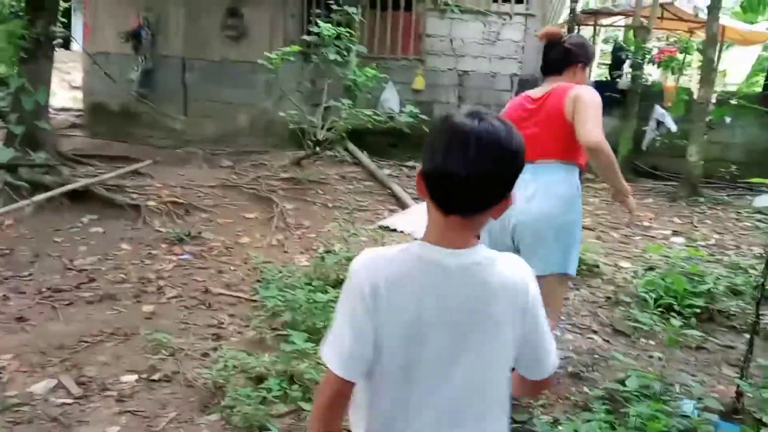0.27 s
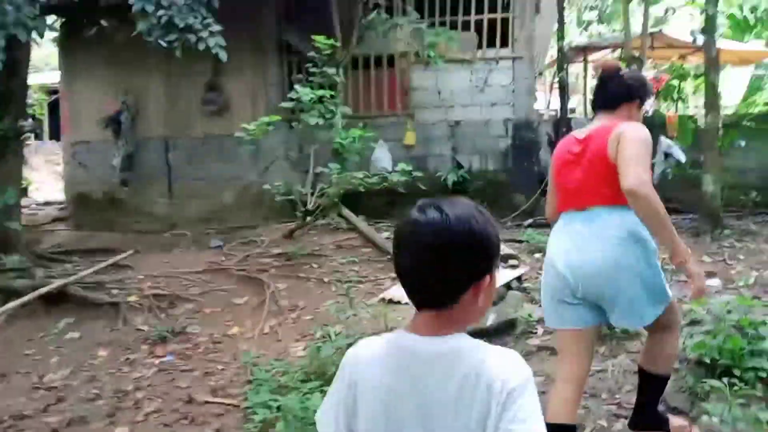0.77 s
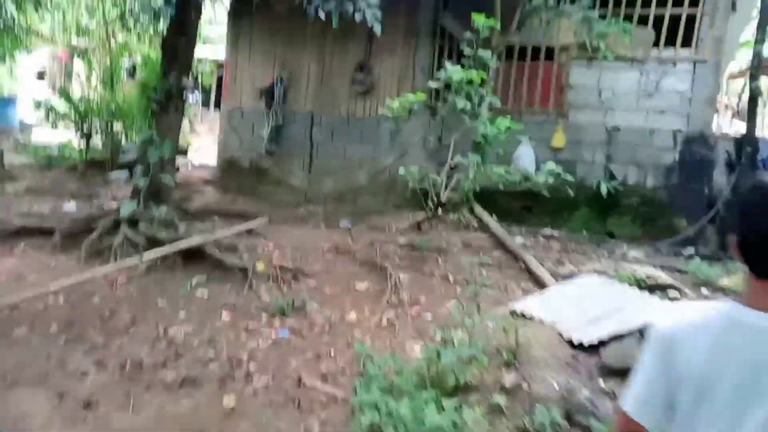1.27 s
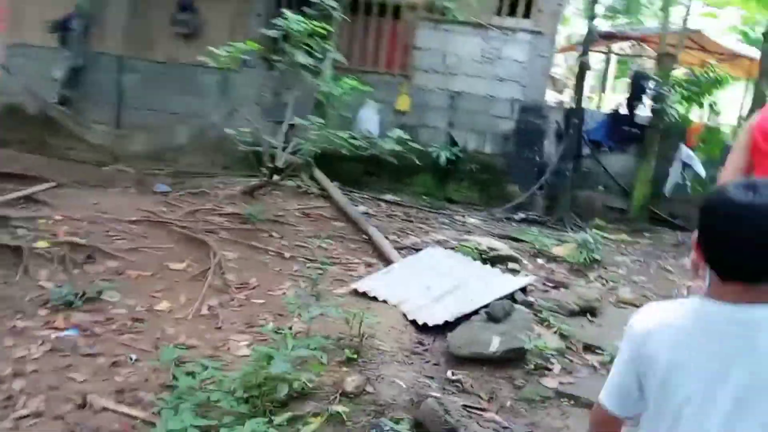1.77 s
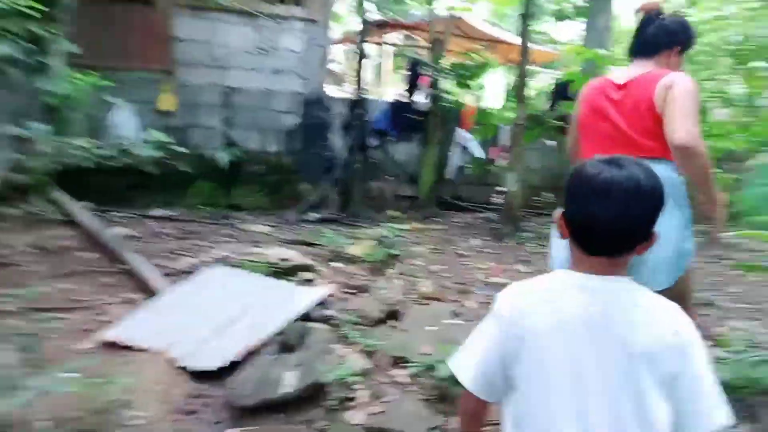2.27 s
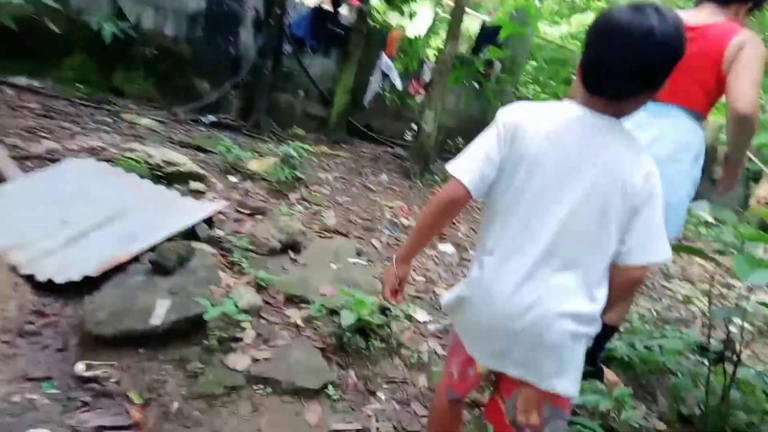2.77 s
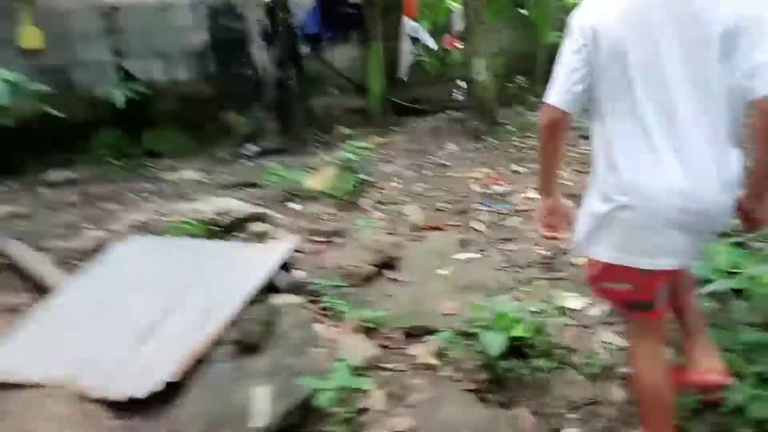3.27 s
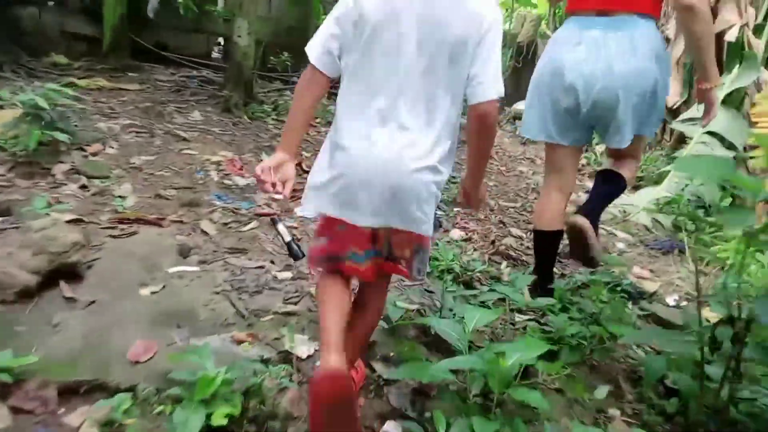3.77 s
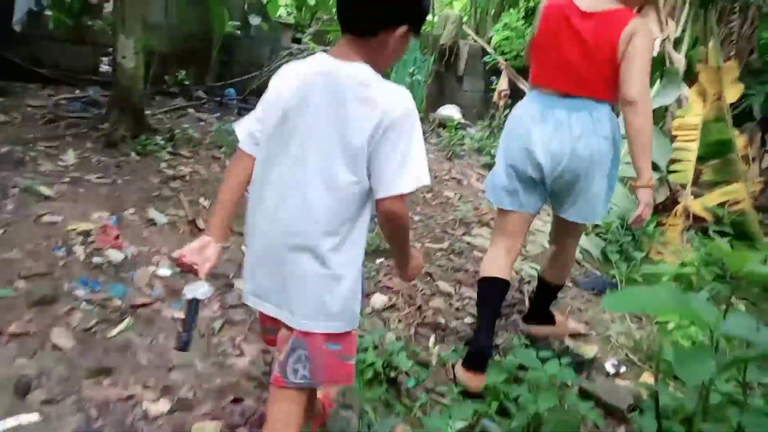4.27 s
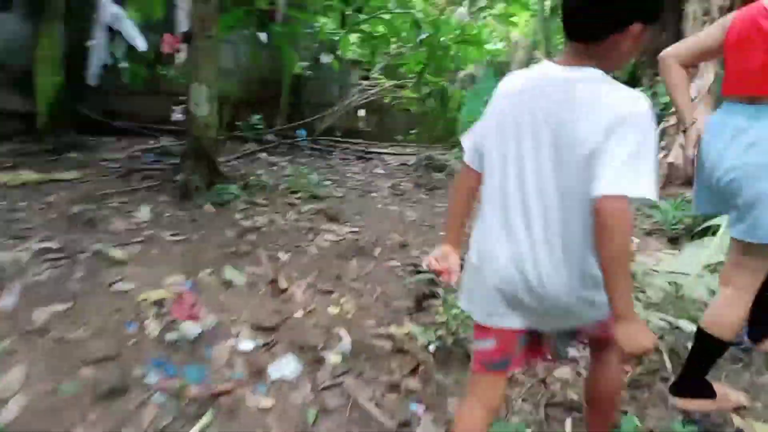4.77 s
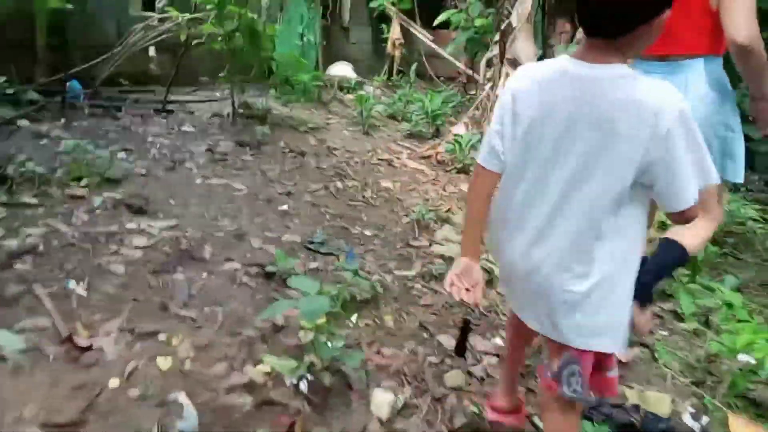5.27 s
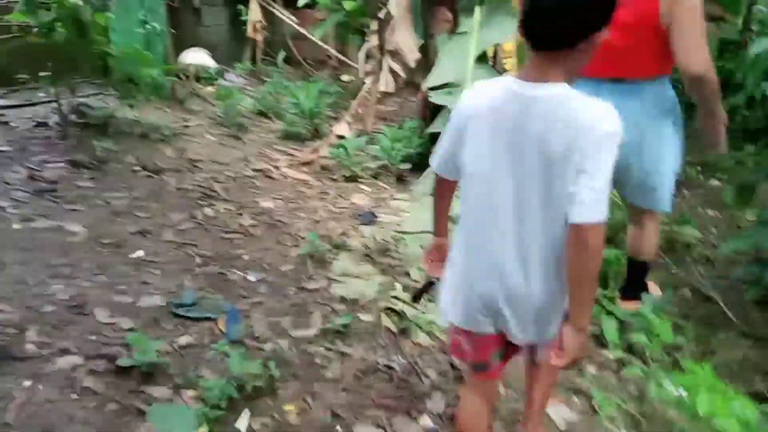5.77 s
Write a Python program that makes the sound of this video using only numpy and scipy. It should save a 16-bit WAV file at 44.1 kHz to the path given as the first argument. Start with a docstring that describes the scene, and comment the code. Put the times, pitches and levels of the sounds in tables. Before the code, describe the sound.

A nearby rooster crows loud and hoarse as feet rustle through dry leaves and snap twigs, then a distant rooster answers more faintly.

```python
"""A rooster close by crows hoarsely in a wooded yard: two beating membranes and a noise-driven windpipe.
From the start feet stir dry leaves, as dense noise grains, over air, rumble, a motor hum and insect hiss.
Twigs snap and heels knock as short rings; then come hoarse chirps and a haze (noise in one band each)
and thin whistled tones that glide, near 2 kHz.
Soles scuff soil, and a distant rooster answers with a cleaner crow whose octave often leads."""
import sys
import numpy as np
from scipy import signal
from scipy.fft import rfft, irfft, next_fast_len
from scipy.io import wavfile
from scipy.ndimage import uniform_filter1d

SR = 44100
rng = np.random.default_rng(int(sys.argv[2]) if len(sys.argv) > 2 else 0)


def materialize(psi):
    """Save the field psi as 16-bit PCM at rate SR to the path in sys.argv[1].

    A 1-D psi becomes a single channel; in a 2-D psi each row is a channel.
    """
    bounded = np.clip(np.atleast_2d(psi).T, -1, 1)
    quanta = np.round(bounded * 32767).astype(np.int16)
    wavfile.write(sys.argv[1], SR, quanta)


def linear_from_db(decibels):
    """Turn decibels (scalar or array-like) into linear amplitude factors; 0 gives 1."""
    return 10 ** (np.asarray(decibels, float) / 20)


N = 264820
T = np.arange(N) / SR


def evened(x):
    """Normalisation: scales to rms 1."""
    return x / np.sqrt(np.mean(x ** 2) + 1e-20)


def add(mix, s, sound):
    """Superposition: adds a sound into the mix from time s."""
    part = mix[round(s * SR):][:len(sound)]
    part += sound[:len(part)]


def along(rows):
    """Linear interpolation of a table: sample times, then each column per sample."""
    s, *columns = np.transpose(rows)
    t = np.arange(s[0], s[-1], 1 / SR)
    return [t] + [np.interp(t, s, c) for c in columns]


def drift(length, seconds):
    """Low-pass random fluctuation: noise averaged twice over a window, at rms 1."""
    size = max(round(seconds * SR), 1)
    noise = rng.standard_normal(length)
    return evened(uniform_filter1d(uniform_filter1d(noise, size), size))


def resonate(x, hz, width):
    """Resonance by heterodyning: shift hz to zero, low-pass with a double pole, shift back; peak gain 1."""
    turn = np.exp(2j * np.pi * np.cumsum(hz * np.ones(len(x))) / SR)
    r = np.exp(-np.pi * width / SR)
    lowered = signal.lfilter([(1 - r) ** 2], [1, -2 * r, r * r], x / turn)
    return 2 * (turn * lowered).real


def colour(x, points):
    """Linear filtering: multiplies the spectrum by a gain curve over log frequency."""
    f, db = np.transpose(points)
    size = next_fast_len(N)
    hz = np.fft.rfftfreq(size, 1 / SR)
    gain = linear_from_db(np.interp(np.log(hz + 1), np.log(f), db))
    return irfft(rfft(x, size) * gain)[..., :N]


def coloured_noise(points):
    """Spectral shaping: white noise given a relative spectrum, at rms 1."""
    return evened(colour(rng.standard_normal(N), points))


def noise_bands(rows):
    """Narrow-band noise: a sum of independently driven resonances."""
    return sum(linear_from_db(db) * evened(resonate(rng.standard_normal(N), hz, width)) for hz, width, db in rows)


def strokes(rows):
    """Exponential growth and decay: strokes swell and fall at steady dB rates; their powers add."""
    power = 0
    for s, db, rise, fall in rows:
        below_peak = 10 * np.maximum((s - T) / rise, (T - s) / fall)
        power = power + linear_from_db(2 * (db - below_peak))
    return np.sqrt(power)


# Turbulent breath: t/s, level/dB over effort, beak level/dB over windpipe, beak f/Hz
BREATH_TRACK = [(0, -4, -2, 3160), (.08, -6, -3, 3200), (.17, -11, -1, 3400), (.28, -7, -1, 3250),
                (.48, -9, 3, 3380), (.66, -6, 2, 3220), (.84, -6, -6, 3150), (1.25, -4, -4, 3170),
                (1.4, -14, 2, 3200), (1.85, -11, -3, 3240)]
# Windpipe resonances: f/Hz, pole width/Hz, level/dB
WINDPIPE_MODES = [(764, 71, -2), (1009, 113, -7), (1600, 110, -1), (1750, 140, -1), (1970, 210, -3.5),
                  (2356, 140, -18), (6520, 600, -27)]
# Beak resonances: multiple of beak f, pole width/Hz, level/dB
BEAK_MODES = [(1, 210, -15), (.97, 1100, -20)]
SLAPS_PER_S, SLAP_SHARE = 250, .65  # mean rate before jitter; weight of slaps against puffs
PIPE_WANDER = .02  # rms wander of the windpipe resonances, as a fraction of their frequency


def rasp():
    """Source-filter principle: the membranes beat; uneven slaps and puffs ring windpipe and beak."""
    t, share_db, beak_db, beak_hz = along(BREATH_TRACK)
    turns = np.cumsum(SLAPS_PER_S * (1 + .4 * drift(len(t), seconds=.004))) / SR
    beat = turns.astype(int)
    size = linear_from_db(3 * rng.standard_normal(len(t)))[beat]  # one size a beat
    puffs = (.25 + size * np.exp(-(turns % 1) / .25)) * rng.standard_normal(len(t))
    slaps = size * np.diff(beat, prepend=0)
    drive = SLAP_SHARE * evened(slaps) + (1 - SLAP_SHARE) * evened(puffs)
    pipe = np.zeros(len(t))
    for hz, width, db in WINDPIPE_MODES:
        moving_hz = hz * (1 + PIPE_WANDER * drift(len(t), seconds=.04))
        pipe += linear_from_db(db) * evened(resonate(drive, moving_hz, width))
    beak = sum(linear_from_db(db) * evened(resonate(drive, k * beak_hz, width)) for k, width, db in BEAK_MODES)
    return t[0], linear_from_db(share_db) * (pipe + linear_from_db(beak_db) * beak)


def membrane(t, hz, first_db, second_db, rough, order=(1, 2), faint_db=-60, waver_db=2.2):
    """Periodic vibration: two wavering partials and a faint double of the upper; roughness modulates both."""
    rough = np.clip(rough, 0, 1)
    phase = 2 * np.pi * np.cumsum(hz) / SR + 2.2 * rough * drift(len(t), seconds=.006)
    swing = 1 + 1.5 * rough * drift(len(t), seconds=.006)
    first_gain = linear_from_db(first_db + waver_db * drift(len(t), seconds=.02))
    second_gain = linear_from_db(second_db + waver_db * drift(len(t), seconds=.02))
    tone = first_gain * np.sin(order[0] * phase)
    tone += second_gain * np.sin(order[1] * phase)
    tone += linear_from_db(second_db + faint_db) * np.sin(2 * order[1] * phase)
    return t[0], np.sqrt(2) * tone * swing * signal.windows.tukey(len(t), .08)


# One effort drives both membranes and the breath: t/s, level/dB
EFFORT_TRACK = [(0.0, -37), (0.07, -47), (0.083, -36), (0.112, -30), (0.2, -26), (0.256, -36), (0.4, -24),
                (0.592, -25), (0.775, -55), (0.787, -41), (0.804, -41), (0.814, -32), (0.87, -28),
                (1.34, -31), (1.472, -36), (1.53, -45), (1.566, -32), (1.592, -42), (1.612, -33),
                (1.828, -63), (1.85, -58)]
# Lower membrane of the syrinx, sagging in pitch at the end:
# t/s, f/Hz, first partial level/dB over effort, octave level/dB over effort, roughness (0-1)
LOWER_MEMBRANE = [(0, 730, -10, -25, .25), (.1, 760, -7, -24, .28), (.16, 745, -16, -28, .28),
                  (.33, 750, -6, -26, .28), (.43, 750, -18, -28, .25), (.54, 752, -5, -28, .05),
                  (.66, 770, -15, -22, .3), (.88, 728, -5, -26, .14), (1.07, 725, -8, -28, .22),
                  (1.22, 720, -15, -26, .25), (1.32, 728, -6, -20, .2), (1.36, 688, -5, -8, .1),
                  (1.62, 650, -6, -9, .12), (1.8, 595, -12, -9, .3)]
# Upper membrane, one table a syllable: t/s, f/Hz, first level/dB over effort, octave level/dB over effort
UPPER_MEMBRANE = [
    [(.1, 935, -16, -8), (.13, 935, -4, -4), (.27, 920, -8, -4)],
    [(.28, 985, -13, -11), (.42, 963, -3, -4), (.58, 995, -12, -4), (.68, 1000, -16, -11)],
    [(.79, 1010, -12, -5), (.9, 975, -16, -11), (1.05, 985, -11, -13), (1.4, 930, -23, -21)],
]
# Doubled cycle, partials at 5 and 7 halves of the low pitch:
# start t/s, end t/s, fifth level/dB over effort, seventh level/dB over effort
CYCLE_DOUBLING = (1.36, 1.76, -10, -21)


def near_rooster():
    """Common modulation: membranes, breath and late period doubling swell with one effort."""
    t, effort_db = along(EFFORT_TRACK)
    voice = np.zeros(len(t))
    add(voice, *rasp())
    add(voice, *membrane(*along(LOWER_MEMBRANE)))
    for rows in UPPER_MEMBRANE:
        add(voice, *membrane(*along(rows), rough=.1))
    start, end, fifth_db, seventh_db = CYCLE_DOUBLING
    late = np.arange(start, end, 1 / SR)
    low_hz = np.interp(late, *np.transpose(LOWER_MEMBRANE)[:2])
    add(voice, *membrane(late, low_hz / 2, fifth_db, seventh_db, .06, order=(5, 7)))
    return t[0], linear_from_db(effort_db) * voice


def rustle(rows, points, per_s, spread_db):
    """Shot noise: random crackles of uneven size, smeared over about a millisecond, under foot strokes."""
    happens = rng.random(N) < per_s / SR
    size = linear_from_db(spread_db * np.minimum(rng.exponential(1, N), 5)) * happens
    grains = (.5 + signal.lfilter([1], [1, -.97], size)) * rng.standard_normal(N)
    return strokes(rows) * evened(colour(grains, points))


# Feet in dry leaves, one row a step: t/s, level/dB, 10 dB rise time/s, 10 dB fall time/s
LEAF_STEPS = [(0, -54, .01, .05), (.17, -55, .1, .07), (.35, -54, .01, .3), (.6, -44, .02, .02),
              (1.03, -52, .02, .12), (1.62, -51, .1, .06), (2.04, -62, .02, .2), (2.17, -58, .1, .2),
              (2.6, -63, .08, .08), (3.19, -55, .25, .25), (3.63, -57, .1, .2), (3.9, -59, .2, .13),
              (4.21, -58, .012, .4), (4.93, -53, .09, .17), (5.31, -56, .1, .055), (5.5, -56, .05, .07),
              (5.7, -59, .06, .1)]
# Relative spectrum of the leaves: f/Hz, level/dB
LEAF_SPECTRUM = [(1500, -60), (2300, -1), (3000, -19.5), (4000, 3.5), (4800, 5.5), (5700, -2), (6500, -5),
                 (8000, -14), (11000, -4), (16000, -50)]


def leaves():
    """Shot noise of bright, sparser crackles: feet in dry leaves."""
    return rustle(LEAF_STEPS, LEAF_SPECTRUM, per_s=360.0, spread_db=2.5)


# Relative spectrum of the outdoor wash: f/Hz, level/dB
WASH_SPECTRUM = [(88, -33), (150, 4.5), (318, -2), (687, 0), (1160, -8), (1840, -2), (2360, -14),
                 (3820, -10), (5720, -11), (7940, -6), (15000, -19.5)]


def wash():
    """Stationary random noise: the steady outdoor wash, barely wavering in level."""
    return linear_from_db(-61.5 + 0.4 * drift(N, seconds=0.02)) * coloured_noise(WASH_SPECTRUM)


# Heavier footfalls: t/s, level/dB before the waver
FOOT_THUDS = [(.12, -56), (.52, -60), (1, -63), (1.62, -60), (2.91, -61), (3.15, -64), (3.56, -65),
              (4.91, -59)]
# Relative spectrum of thuds and rumble: f/Hz, level/dB
THUD_SPECTRUM = [(20, -23), (60, 2), (130, -5.5), (200, -10), (400, -17), (1000, -35)]


def rumble():
    """Amplitude modulation of low noise: footfalls thud over a lumpy rumble."""
    rise_s, fall_s, floor_db = .07, .18, -67.5
    lumps = linear_from_db(floor_db) + strokes([(s, db, rise_s, fall_s) for s, db in FOOT_THUDS])
    return lumps * linear_from_db(1.8 * drift(N, seconds=0.018)) * coloured_noise(THUD_SPECTRUM)


# Distant motor: f/Hz, pole width/Hz, level/dB before the swell
MOTOR_BANDS = [(62.8, 27, -78.5), (120.2, 8.9, -73)]
# Swell of the motor: t/s, gain level/dB
MOTOR_SWELL = [(0, 0), (1.3, 4), (2, -1), (6, -1)]


def hum():
    """Narrow-band noise: a distant motor whose level swells and sinks."""
    return linear_from_db(np.interp(T, *np.transpose(MOTOR_SWELL))) * noise_bands(MOTOR_BANDS)


# Insects in the trees: f/Hz, pole width/Hz, level/dB before the swell
INSECT_BANDS = [(6400, 1500, -78), (8050, 970, -69.5), (10550, 1500, -68)]
# Swell of the insects: t/s, gain level/dB
INSECT_LEVELS = [(0, 2.5), (1.2, 4), (2.5, -4), (6, -5.5)]


def insects():
    """Band-limited noise: a high hiss that swells, then recedes."""
    return linear_from_db(np.interp(T, *np.transpose(INSECT_LEVELS))) * noise_bands(INSECT_BANDS)


def air():
    """Incoherent superposition: the independent background noises add."""
    return wash() + rumble() + hum() + insects()


def yard(x):
    """Scattering by walls and trunks: sparse taps of random sign decay exponentially, 60 dB in 0.24 s."""
    grid = np.arange(400, SR // 2, 20)  # the first echo comes after 9 ms
    at = grid + rng.integers(0, 20, len(grid))
    taps = np.zeros(SR)
    taps[at] = rng.choice([-1., 1.], len(at)) * linear_from_db(-60 * at / SR / 0.24)
    return signal.fftconvolve(x, taps / np.linalg.norm(taps))[:N]


def crack(s, db, hz, t60):
    """Impulse excitation: one sharp break and dying noise ring a broad resonance at hz."""
    t = np.arange(2000) / SR
    push = rng.standard_normal(len(t)) * linear_from_db(-60 * t / t60) + 12 * (t == 0)
    ring = resonate(push, hz, 0.29 * hz)
    return s, linear_from_db(db) * ring / abs(ring).max()


# Twigs: t/s, peak level/dB, f/Hz
TWIG_SNAPS = [(0.3521, -31, 4270), (0.5821, -27, 5200), (0.601, -17, 4700), (1.0226, -36.5, 3958),
              (1.6122, -43, 4340), (1.7739, -47, 6370), (2.8449, -42, 3300), (3.038, -37.5, 3800),
              (3.6227, -43, 3050), (3.6227, -36, 4400), (4.2068, -46, 4830), (4.4453, -41, 4300),
              (4.9232, -47, 3037), (4.9721, -38, 4260), (5.0419, -39, 4130), (5.2589, -45, 4220),
              (5.3188, -40, 4430), (5.5009, -43, 4300)]


def twigs(mix):
    """Brittle fracture: twigs snap as brief, high rings."""
    for row in TWIG_SNAPS:
        add(mix, *crack(*row, t60=.03))


# Heels on stones and roots: t/s, peak level/dB, f/Hz
HEEL_KNOCKS = [(0.602, -18, 1000), (2.472, -52.5, 730), (4.46, -42, 1470), (4.866, -40, 1530),
               (4.883, -43, 1250), (4.902, -44, 750), (4.962, -38, 1810), (5.499, -40, 1390),
               (5.519, -46, 1680)]


def heels(mix):
    """Impact: heels knock on stones and roots as lower, longer rings."""
    for row in HEEL_KNOCKS:
        add(mix, *crack(*row, t60=0.043))


# Hoarse chirps and a long faint haze near 3.1 kHz: t/s, duration/s, f/Hz, pole width/Hz, level/dB
CHIRP_AND_HAZE_BANDS = [(1.8, 0.077, 1920, 400, -59), (2.03, 0.19, 1930, 200, -61),
                        (2.355, .14, 2060, 130, -63), (2.43, .12, 1880, 90, -66),
                        (2.515, 0.16, 3300, 650, -61), (2.755, 0.2, 3100, 300, -62.5),
                        (2.927, .3, 3100, 250, -63.5), (3.16, 0.09, 2800, 200, -65),
                        (3.3, .75, 3120, 450, -68.5), (4.62, 0.22, 2900, 400, -66),
                        (5.63, 0.2, 1650, 196, -62.5), (5.78, 0.19, 3300, 400, -68.5)]


def chirps_and_haze(mix):
    """Resonance of noise: hoarse chirps and a long faint haze near 3.1 kHz, each noise in one band."""
    for s, length, hz, width, db in CHIRP_AND_HAZE_BANDS:
        band = evened(resonate(rng.standard_normal(round(length * SR)), hz, width))
        add(mix, s, linear_from_db(db) * band * signal.windows.tukey(len(band), .7))


# Thin gliding tones: faint bird whistles and perhaps a third, distant rooster:
# t/s, duration/s, start f/Hz, end f/Hz, start level/dB, end level/dB
THIN_TONES = [(1.98, .12, 2070, 2105, -47, -52), (2.08, .17, 2110, 2190, -60, -67),
              (2.54, .12, 1800, 1795, -59, -60), (2.82, .14, 1810, 1810, -65, -67),
              (4.245, .16, 1990, 1965, -42, -56), (4.385, .165, 1945, 1985, -54, -42),
              (4.53, .1, 1985, 1970, -58, -68), (4.64, .17, 1630, 1630, -63, -66)]
# Throb of the first tone: start t/s, end t/s, throb f/Hz, depth (fraction)
TONE_THROB = (2.0, 2.06, 60, .75)


def thin_tone(s, length, from_hz, to_hz, from_db, to_db):
    """Frequency and amplitude modulation: one unsteady tone glides in pitch and level."""
    t, hz, level_db = along([(s, from_hz, from_db), (s + length, to_hz, to_db)])
    phase = 2 * np.pi * np.cumsum(hz) / SR + 0.2 * drift(len(t), seconds=0.009)
    start, end, per_s, depth = TONE_THROB
    throb = depth * np.sin(2 * np.pi * per_s * (t - start)) * (t > start) * (t < end)
    swing = 1 + throb + .25 * drift(len(t), seconds=.008)
    return s, np.sqrt(2) * linear_from_db(level_db) * swing * np.sin(phase) * signal.windows.tukey(len(t), .4)


def thin_tones(mix):
    """Superposition of gliding tones: faint bird whistles and perhaps a third, distant rooster."""
    for row in THIN_TONES:
        add(mix, *thin_tone(*row))


# Soles on soil: t/s, level/dB, 10 dB rise time/s, 10 dB fall time/s
SCUFF_STEPS = [(2.76, -57, .015, .07), (3.02, -62, .05, .1), (3.22, -54, .2, .08), (3.65, -62, .1, .4),
               (4.928, -52, .065, .12), (5.27, -56, .012, .09), (5.496, -57, .01, .04)]
# Relative spectrum of the soil: f/Hz, level/dB
SOIL_SPECTRUM = [(200, -48), (500, -15), (900, -9), (1300, -11), (1800, -1.5), (2150, -6), (2500, -63),
                 (5000, -78)]


def scuffs():
    """Shot noise of duller, denser grains: soles scuff soil."""
    return rustle(SCUFF_STEPS, SOIL_SPECTRUM, per_s=720.0, spread_db=2.0)


def far_syllable(rows, rough, per_s):
    """Harmonic tone with amplitude modulation: a throbbing voice, breath noise around both partials."""
    t, hz, first_db, octave_db = along(rows)
    s, tone = membrane(t, hz, first_db, octave_db, rough, faint_db=-31, waver_db=1.5)
    air_flow, width = rng.standard_normal(len(t)), 200
    breath = linear_from_db(first_db) * evened(resonate(air_flow, hz, width))
    breath += linear_from_db(octave_db) * evened(resonate(air_flow, 2 * hz, 2 * width))
    throb = 1 - .25 * np.cos(2 * np.pi * per_s * (t - s - .01))
    return s, throb * tone + linear_from_db(-11) * breath


# Far rooster, one table a syllable: t/s, f/Hz, first partial level/dB, octave level/dB
FAR_SYLLABLES = [
    [(2.96, 775, -74, -56), (3.06, 790, -50, -46), (3.12, 785, -62, -56)],
    [(3.285, 930, -62, -64), (3.325, 965, -48, -45), (3.4, 945, -53, -50), (3.45, 950, -60, -56),
     (3.48, 960, -74, -58), (3.54, 975, -80, -60)],
    [(3.49, 784, -68, -60), (3.55, 800, -50, -51), (3.6, 820, -50, -50), (3.65, 868, -52, -48),
     (3.69, 872, -51, -50), (3.75, 835, -53, -50), (3.81, 808, -44, -42), (3.86, 800, -51, -48),
     (3.94, 788, -56, -52), (4.05, 775, -68, -64)],
    [(4.1, 803, -72, -64), (4.135, 798, -58, -53), (4.2, 794, -53, -46), (4.27, 790, -48, -48),
     (4.38, 782, -56, -46), (4.44, 774, -67, -47), (4.5, 766, -64, -43), (4.6, 752, -72, -50),
     (4.68, 742, -69, -53), (4.76, 732, -54, -58), (4.86, 718, -58, -64)],
]
# Roughness of each far syllable (0-1)
FAR_ROUGHNESS = [.1, .13, .14, .05]
# Throb of each far syllable: f/Hz
FAR_THROB_HZ = [30, 30, 33, 16.5]


def far_rooster(mix):
    """Harmonic vibration: four syllables, cleaner than the near crow."""
    for row in zip(FAR_SYLLABLES, FAR_ROUGHNESS, FAR_THROB_HZ):
        add(mix, *far_syllable(*row))


# Gentle low cut on the birds, a few dB less below about 600 Hz: f/Hz, gain level/dB
BIRD_LOW_CUT = [(380, -4), (620, -0.5)]
# Difference of the air between left and right: f/Hz, gain level/dB
AIR_WIDTH = [(60, -31), (300, -30.5), (1500, -26), (5000, -9.5), (15000, -11)]


def scene():
    """Mid-side stereophony: birds and steps echo over the air; nearly all arrives alike at both sides."""
    birds, steps = np.zeros(N), np.zeros(N)
    add(birds, *near_rooster())
    chirps_and_haze(birds)
    thin_tones(birds)
    far_rooster(birds)
    birds = colour(birds, BIRD_LOW_CUT)
    twigs(steps)
    heels(steps)
    steps += leaves() + scuffs()
    mid = birds + steps + yard(linear_from_db(-10) * (birds + steps)) + air()
    side = colour(air(), AIR_WIDTH) + yard(linear_from_db(-48) * birds + linear_from_db(-30) * steps)
    return np.array([mid + side, mid - side])


def low_pass(x):
    """Removes everything above the highest recorded frequency."""
    return signal.sosfilt(signal.butter(12, 16580, fs=SR, output="sos"), x)


# Overall response, a dip near 2.5 kHz, a treble step and a steep cutoff at 15.5 kHz: f/Hz, gain level/dB
CHAIN_RESPONSE = [(2200, 0.5), (2500, -2), (2900, 5), (5300, -4), (5800, -1.5), (6200, 3), (11400, 0),
                  (11800, -3.5), (15400, 4), (15600, -62)]


def record(dry):
    """Linear filtering: the frequency response of the whole chain colours the mix."""
    mix = colour(dry, CHAIN_RESPONSE)
    return low_pass(mix)


dry = scene()
out = record(dry)
materialize(out)
```